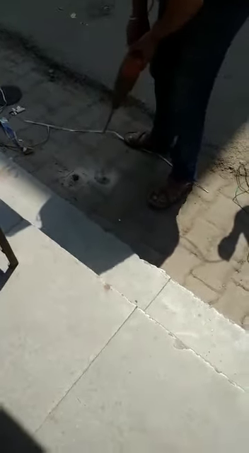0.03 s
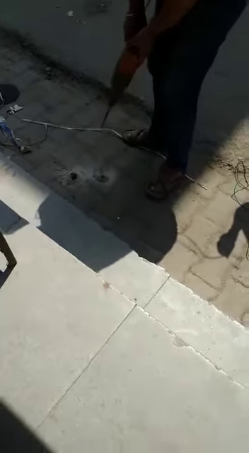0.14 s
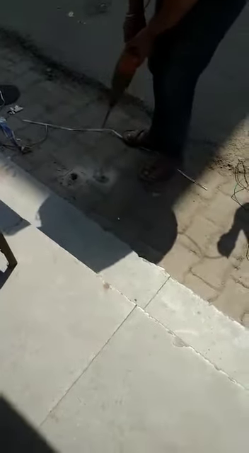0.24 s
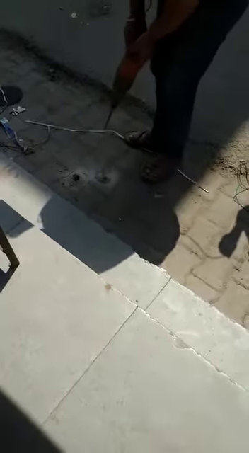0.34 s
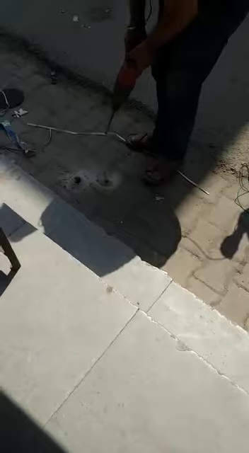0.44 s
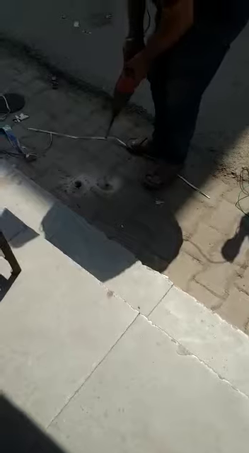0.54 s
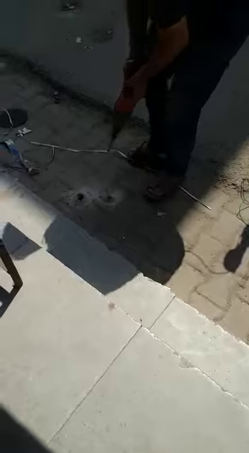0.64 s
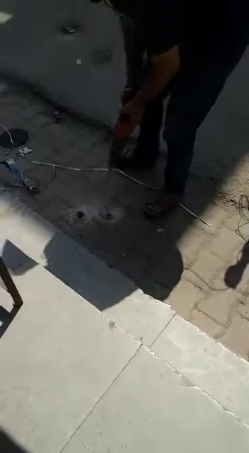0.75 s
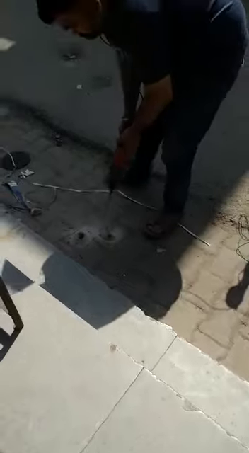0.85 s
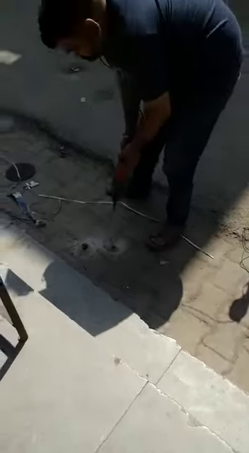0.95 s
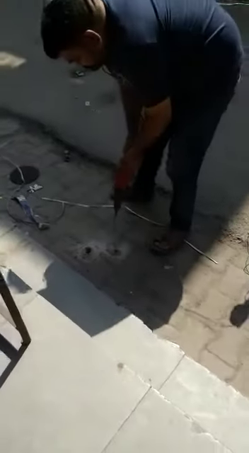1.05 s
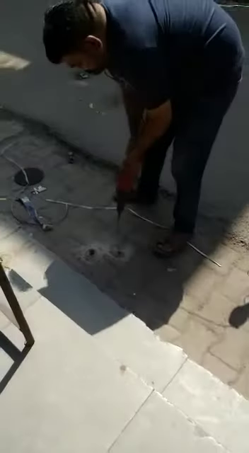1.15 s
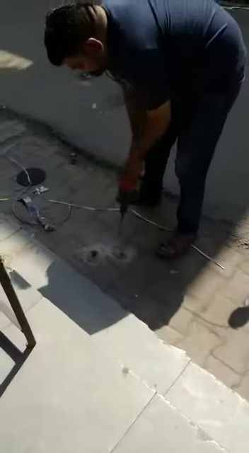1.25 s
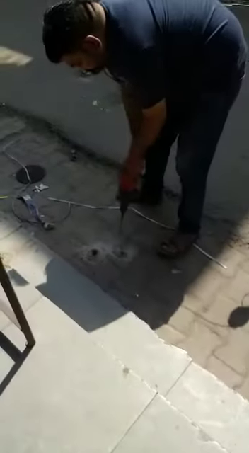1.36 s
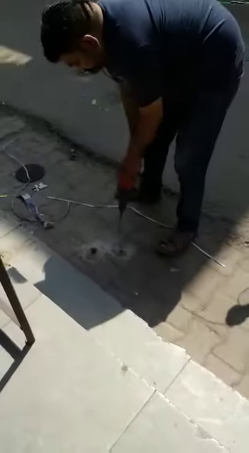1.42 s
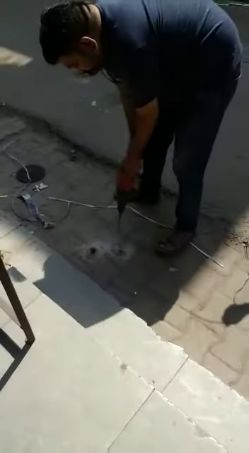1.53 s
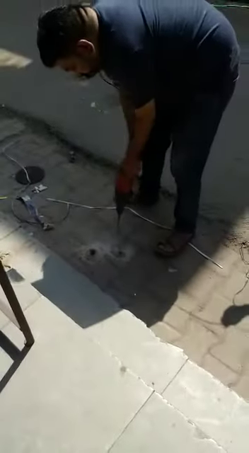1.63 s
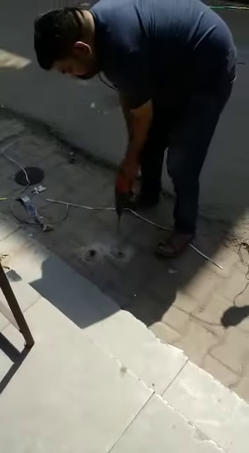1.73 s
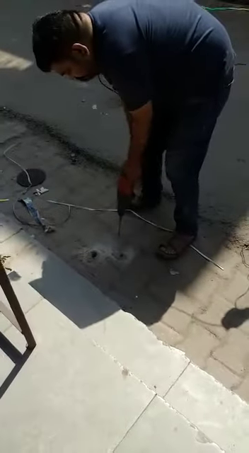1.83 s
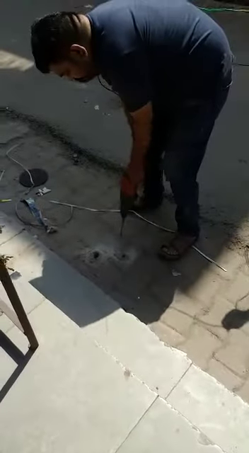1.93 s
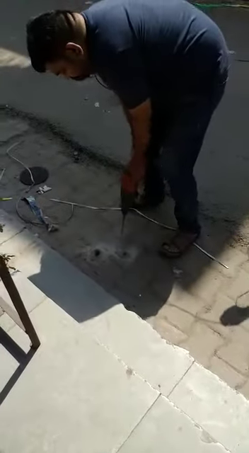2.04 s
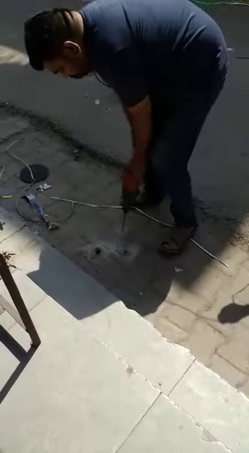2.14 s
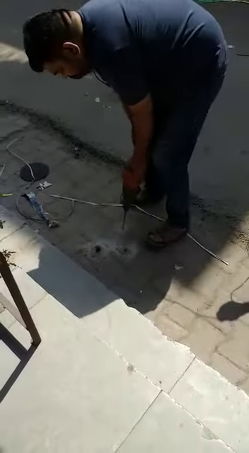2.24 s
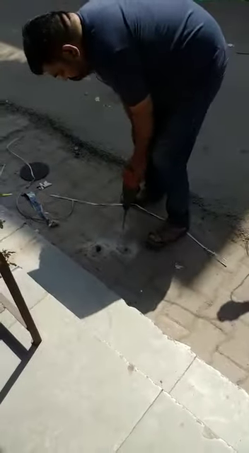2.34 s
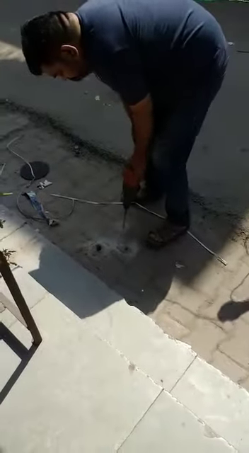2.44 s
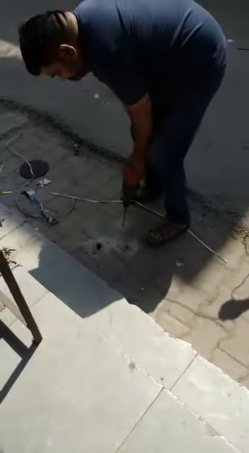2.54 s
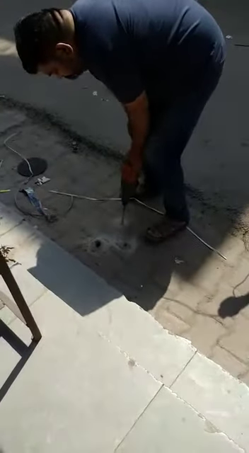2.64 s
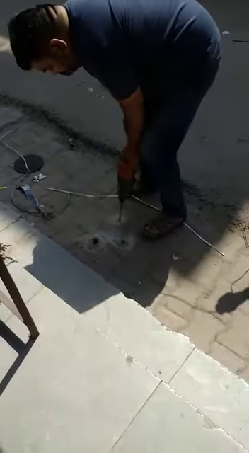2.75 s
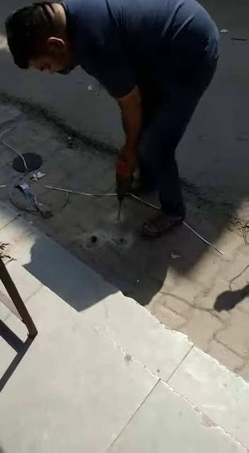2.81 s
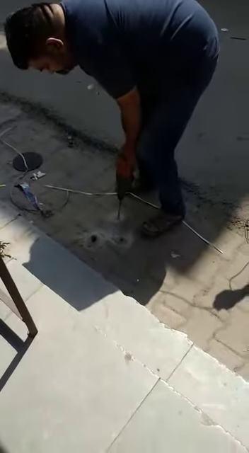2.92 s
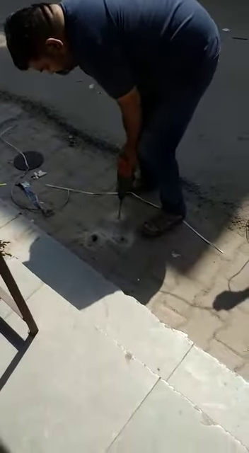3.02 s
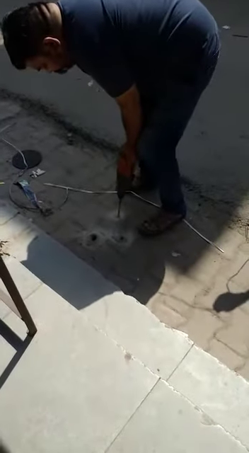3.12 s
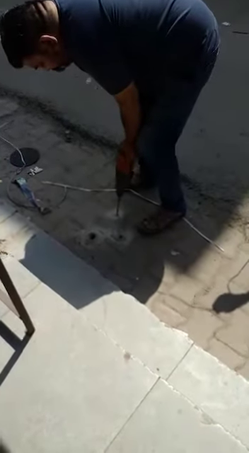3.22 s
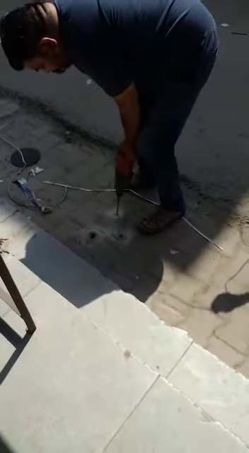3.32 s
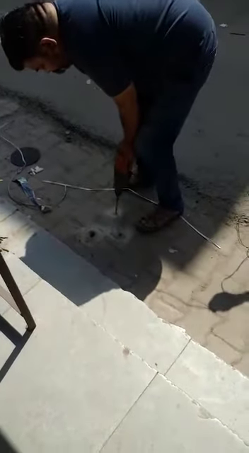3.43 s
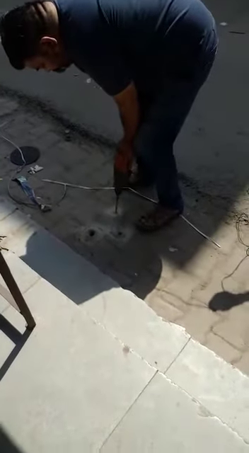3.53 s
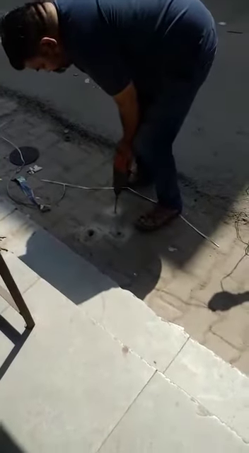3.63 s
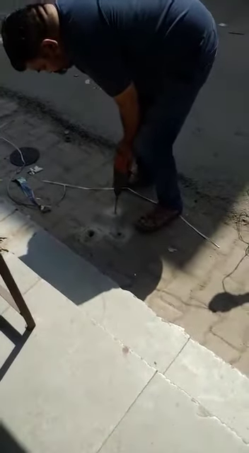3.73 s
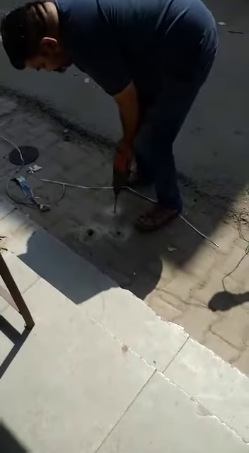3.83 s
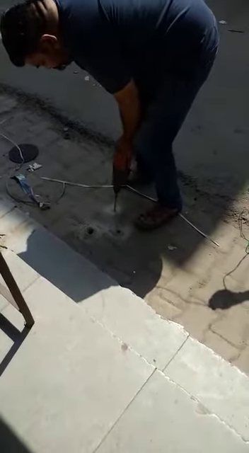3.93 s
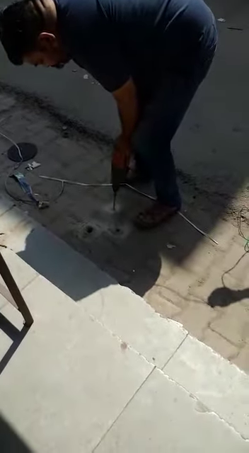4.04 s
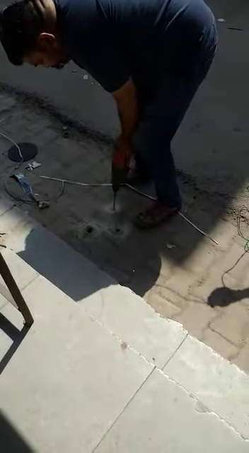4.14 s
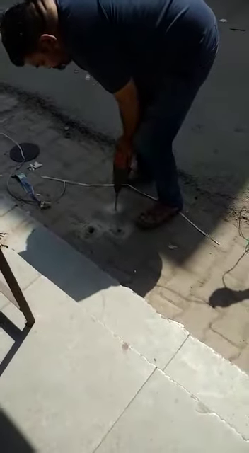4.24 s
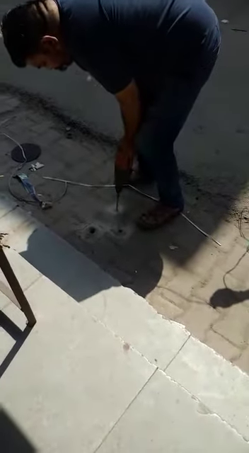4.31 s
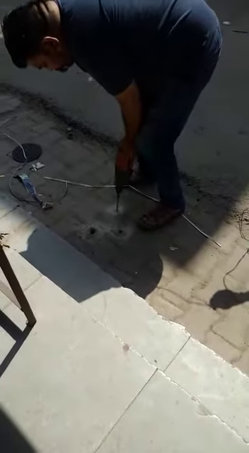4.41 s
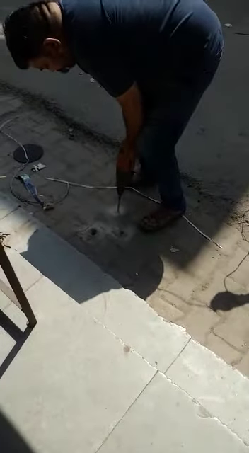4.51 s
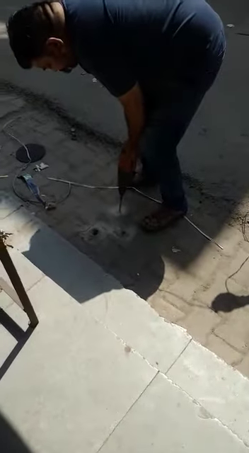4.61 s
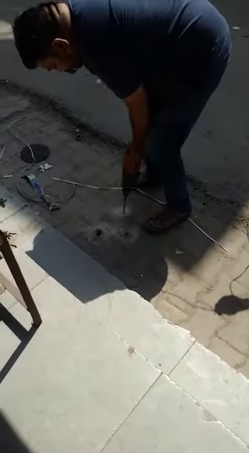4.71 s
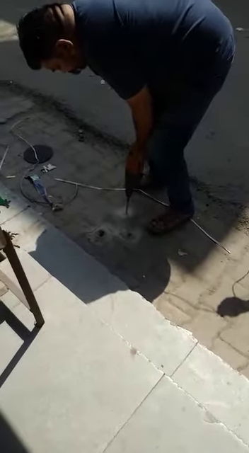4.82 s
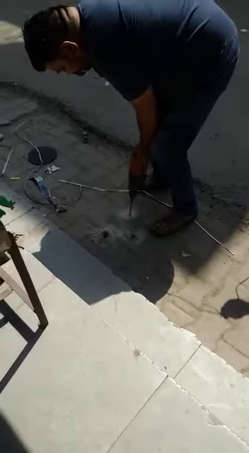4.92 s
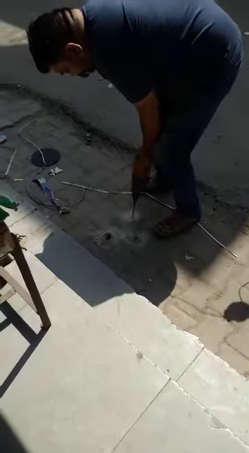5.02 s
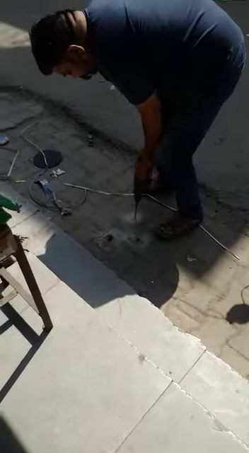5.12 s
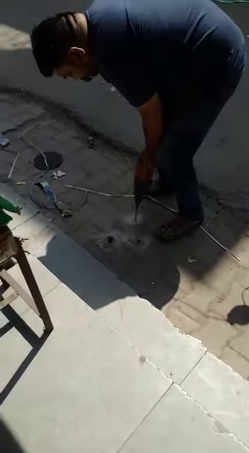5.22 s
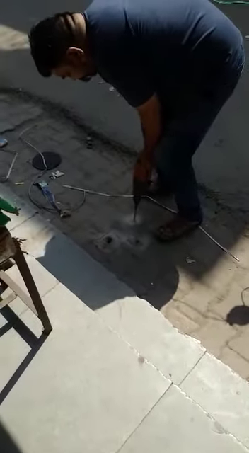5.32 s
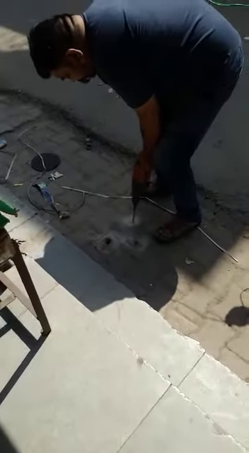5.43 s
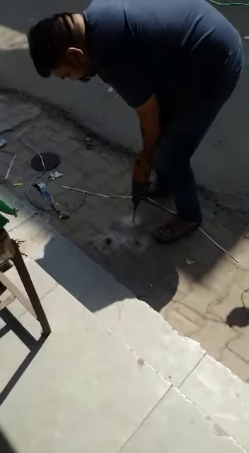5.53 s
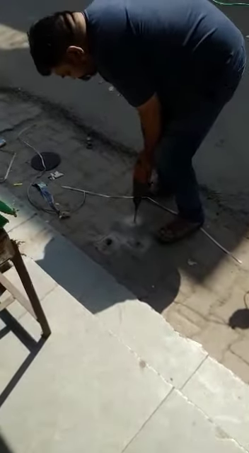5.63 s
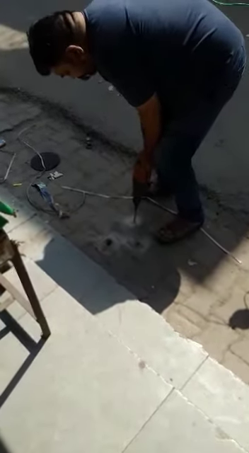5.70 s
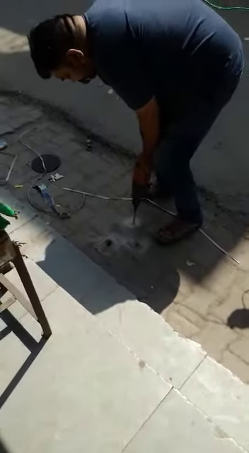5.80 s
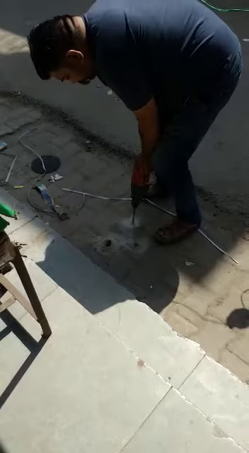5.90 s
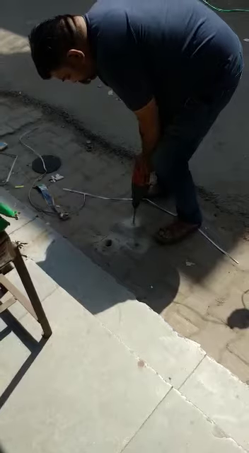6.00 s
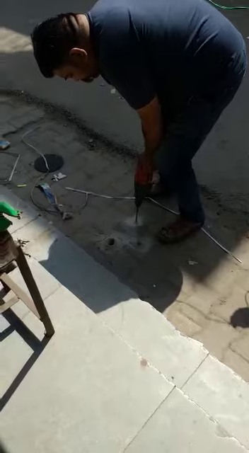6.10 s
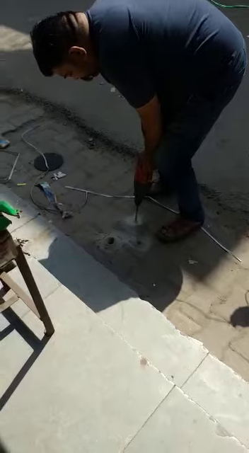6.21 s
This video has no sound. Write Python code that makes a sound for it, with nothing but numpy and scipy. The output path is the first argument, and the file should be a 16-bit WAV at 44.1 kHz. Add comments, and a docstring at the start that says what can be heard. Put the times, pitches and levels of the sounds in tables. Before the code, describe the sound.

A heavy corded hammer drill about two metres away in a lane runs down with a rattling whirr over low street rumble. The bit tip ticks on the paving, the motor spins up fast, the tip rasps, then it bites into concrete with a burst of rapid hammering, steel ringing and gear whine. The drilling continues to the end, softening a little late on. Phone microphone, short reflections from house fronts.

```python
"""A corded hammer drill coasts down, is set on concrete paving, spins up and drills, two metres away in a lane.
One turning shaft times the blows, rebounds and gear play; noise bursts at these moments rattle the housing, and
blows and rebounds ring the steel bit. Tones locked to the shaft make the gear whine and the drone of the slab.
The shank chatters in its chuck, grit snaps, the tip knocks and skids before it bites. Paving and house fronts
reflect the drill over a low street rumble; a phone microphone trims both ends of the spectrum."""
import sys
import numpy as np
from scipy import signal
from scipy.fft import rfft, irfft
from scipy.io import wavfile
from scipy.ndimage import uniform_filter1d

SR = 44100
rng = np.random.default_rng(int(sys.argv[2]) if len(sys.argv) > 2 else 0)


def bounce(signal):
    """Save signal as a 16-bit WAV file at the path given by the first command-line argument."""
    frames = np.transpose(np.atleast_2d(signal))
    limited = np.clip(frames, -1, 1)
    pcm = np.round(limited * 32767).astype(np.int16)
    wavfile.write(sys.argv[1], SR, pcm)


N = 276045
TIME = np.arange(N) / SR

FULL_HZ = 64  # hammer rate that counts as full speed
BITE_S, GRIP_S = 1.728, 0.082  # the tip bites into the concrete; the hammer takes hold over GRIP_S


def undb(db):
    """Decibels to gain."""
    return 10 ** (np.asarray(db) / 20)


def unit(x):
    """Scale to rms 1."""
    return x / np.sqrt(np.mean(x ** 2))


def curves(rows):
    """One value per sample for each column after the time column of a table."""
    s, *columns = np.transpose(rows)
    return [np.interp(TIME, s, column) for column in columns]


def walk(rate_hz):
    """Smooth random wandering with a spread near 1, given a new target rate_hz times a second."""
    step = int(SR / rate_hz)
    targets = np.repeat(rng.standard_normal(N // step + 1), step)
    return unit(uniform_filter1d(targets, step)[:N])


def colour(x, spectrum, size=4096):
    """Causal minimum-phase filter with the given spectrum."""
    hz, db = np.transpose(spectrum)
    bins_hz = np.fft.rfftfreq(size, 1 / SR)
    log_gain = np.log(undb(np.interp(np.log(bins_hz + 1), np.log(hz), db)))
    # folding the cepstrum onto positive time makes the filter causal
    cepstrum = irfft(log_gain) * np.r_[1, np.full(size // 2 - 1, 2), np.zeros(size // 2)]
    impulse = irfft(np.exp(rfft(cepstrum)))
    return signal.fftconvolve(x, impulse)[:N]


def ring(x, modes):
    """Drive a set of resonances side by side."""
    out = np.zeros(N)
    for hz, width_hz, db in modes:
        b, a = signal.iirpeak(hz, hz / width_hz, fs=SR)
        out = out + undb(db) * signal.lfilter(b, a, x)
    return out


def band(x, edge_hz, kind, order=4):
    """Low-pass or high-pass without delay."""
    return signal.sosfiltfilt(signal.butter(order, edge_hz, kind, fs=SR, output="sos"), x)


def steady(x):
    """Hold the level over a fifth of a second at rms 1, so single knocks still stand out."""
    return x / np.sqrt(uniform_filter1d(x ** 2, SR // 5) + 1e-12)


def envelope(start_s, attack_s, hold_s, release_s):
    """Straight rise, hold, straight fall."""
    corners_s = start_s + np.cumsum([0, attack_s, hold_s, release_s])
    return np.interp(TIME, corners_s, [0, 1, 1, 0])


def burst(peak_s, attack_s, hold_s, decay_s):
    """Rise to a peak, hold, then die away exponentially."""
    rise = np.clip(1 + (TIME - peak_s) / attack_s, 0, 1)
    return rise * np.exp(-np.maximum(TIME - peak_s - hold_s, 0) / decay_s)


def swell(middle_s, length_s):
    """A rounded hump with a flat top."""
    return np.exp(-((TIME - middle_s) / (length_s / 2)) ** 4)


# speed of the motor under load: start_s, hammer_rate_hz
LOADED_SPEED = [(1.8, 60.53), (1.9, 61.06), (2.0, 64.57), (2.13, 65.82), (2.62, 65.82), (2.98, 63.88),
                (3.35, 63.62), (3.68, 65.7), (3.85, 65.19), (4.08, 65.55), (4.4, 64.4), (4.7, 64.43),
                (5.35, 63.29), (6.25, 63.04)]
COAST_HZ, COAST_S = 54.02, 1.13  # hammer rate at the start, time constant of the coasting
TRIGGER_S, SPIN_UP_S = 1.43, .17  # moment of the trigger pull, time constant of the spin-up


def motor():
    """Hammer rate in Hz: friction slows the free motor, the trigger spins it up, then the load sets its speed."""
    coasting = COAST_HZ * np.exp(-np.minimum(TIME, TRIGGER_S) / COAST_S)
    spun = 1 - np.exp(-np.maximum(TIME - TRIGGER_S, 0) / SPIN_UP_S)
    # spin-up is complete at the first row of the table
    share = np.minimum(spun / np.interp(LOADED_SPEED[0][0], TIME, spun), 1)
    return coasting + share * (curves(LOADED_SPEED)[0] - coasting)


def knocks(turns, scatter_db, jitter_s):
    """One click per whole turn, each with its own size and a slightly uneven moment."""
    at_s = np.interp(np.arange(1, int(turns[-1])), turns, TIME)
    chance = rng.standard_normal((len(at_s), 2))
    where = np.clip((at_s + jitter_s * chance[:, 0]) * SR, 0, N - 1).astype(int)
    sizes = undb(scatter_db * np.clip(chance[:, 1], -2, 2))
    return np.bincount(where, sizes, N)


def crunch(clicks, decay_s):
    """Each click lets off a short decaying burst of crushing noise."""
    pole = np.exp(-1 / (decay_s * SR))
    return unit(signal.lfilter([1], [1, -pole], clicks) * rng.standard_normal(N))


def hammer(turns):
    """Noise bursts of the main blow, of its rebound, and of gear play on each of 7 armature turns a cycle."""
    blow = crunch(knocks(turns, scatter_db=1.0, jitter_s=.0005), decay_s=.0022)
    rebound = crunch(knocks(turns + .41, scatter_db=0, jitter_s=.0005), decay_s=.0025)
    play = crunch(knocks(7 * turns, scatter_db=2, jitter_s=.0006), decay_s=.0011)
    return steady(blow), steady(rebound), steady(play)


# how the housing colours the rattle: pitch_hz, level_db (relative)
HOUSING_SPECTRUM = [(80, -26), (170, -14), (340, -18.5), (600, -13.5), (820, -8.5), (1020, -7), (1350, -1),
                    (1900, 0), (3000, 0.5), (3700, -3.5), (4600, 0), (5700, 2), (7000, -13), (8500, -27),
                    (10000, -29), (12000, -20), (16000, -20.5)]
# share of knocking against the rush of the fan: running free, and added at a contact of 1
KNOCK_FREE, KNOCK_PRESSED = .17, .28


def housing(blow, rebound, play, contact, treble_db):
    """Blows, gear play and the rush of fan and brushes sound through the gear case; harder running is brighter."""
    rush = rng.standard_normal(N)
    knocking = (KNOCK_FREE + KNOCK_PRESSED * contact) * (blow + undb(-1.5) * rebound)
    body = colour(rush + knocking + undb(-2.5) * play, HOUSING_SPECTRUM)
    low = band(body, 8000, "low")
    treble = body - low
    return steady(low) + undb(treble_db) * steady(treble)


RATTLE_DB_PER_OCTAVE = 13.5  # rise of rattle and whirr for each doubling of speed
WHIRR_DB, WHIRR_SPREAD_HZ = -27.5, 670  # level at full speed, roughness on each side of the mesh tone


def whirr(turns, rate):
    """Without load the teeth rattle in their play, which smears the mesh tone into a band."""
    tone = np.sqrt(2) * np.cos(2 * np.pi * 42 * turns)  # 7 armature turns a cycle x 6 pinion teeth
    rough = unit(band(rng.standard_normal(N), WHIRR_SPREAD_HZ, "low", order=2))
    level_db = WHIRR_DB + RATTLE_DB_PER_OCTAVE * np.log2(rate / FULL_HZ)
    return undb(level_db) * rough * tone


# high modes of the shank, each set passed twice: pitch_hz, width_hz (per pass), level_db (per pass)
SHANK_MODES = [(5530, 260, 1), (9030, 280, -7), (13040, 370, -2)]
# spells of chatter in the chuck: middle_s, length_s, level_db (before the fitful wandering)
CHATTER_SPELLS = [(0, .12, -28), (.2, 0.3, -37), (.47, 0.26, -45), (2.15, .8, -29), (3.8, 0.91, -32),
                  (4.45, 0.5, -39)]


def shank():
    """A thin, fitful ring of steel rubbing in the chuck: noise through its high modes."""
    song = unit(ring(ring(rng.standard_normal(N), SHANK_MODES), SHANK_MODES))
    spells = sum(undb(db) * swell(s, length_s) for s, length_s, db in CHATTER_SPELLS)
    return song * undb(3.0 * walk(63)) * spells


# spectrum of the street air: pitch_hz, level_db (relative)
STREET_SPECTRUM = [(45, -1), (72, 2.5), (100, -1.5), (135, 3.5), (210, -2), (320, -5.5), (420, -5),
                   (640, -4.5), (850, -6.5), (1200, -7.5), (1800, -5), (2500, -14.5), (3500, -22),
                   (6000, -26), (8000, -48)]
# level of the rumble below 207 Hz, before it wavers: start_s, level_db
RUMBLE_LEVEL = [(0, -40.5), (1.0, -40.5), (1.6, -36), (2.4, -47), (4.3, -44.5), (6.26, -52.5)]
# faint tones from down the street: middle_s, length_s, pitch_hz, level_db (peak, before it wavers)
DISTANT_TONES = [(1.46, 0.52, 646, -48), (1.11, 0.26, 2768, -48)]


def street():
    """Wavering rumble of the town, made of coloured noise, with a few thin tones."""
    air = colour(rng.standard_normal(N), STREET_SPECTRUM)
    air = air / np.std(band(air, 207, "low"))
    air = air * undb(curves(RUMBLE_LEVEL)[0] + 1.0 * walk(6.1))
    for s, length_s, hz, db in DISTANT_TONES:
        tone = np.sin(2 * np.pi * hz * TIME)
        air = air + swell(s, length_s) * undb(db + 5.4 * walk(18)) * tone
    return air


# light knocks as the bit is placed: start_s, level_db, ring_s, steel_share (0 housing to 1 steel)
PLACING_TAPS = [(1.282, -35, .018, .97), (1.301, -23.5, .005, 0), (1.312, -31, 0.013, .1),
                (1.33, -30, 0.013, 0.3)]
# rasp of the skidding tip, passed twice: pitch_hz, width_hz (per pass), level_db (per pass)
SKID_RASP = [(4800, 1200, 0)]
SNAP_S, SNAP_DB = .893, -24  # a grain of grit snaps; gain on its high-passed noise
SKID_S, SKID_DB, SKID_DECAY_S = 1.645, -13.5, 0.049


def placing():
    """A grain of grit snaps, the tip knocks on the paving, then skids as it spins up: shaped noise throughout."""
    noise = rng.standard_normal(N)
    steel = unit(ring(ring(noise, SHANK_MODES), SHANK_MODES))
    case = unit(band(colour(noise, HOUSING_SPECTRUM), 2200, "high"))
    snap = undb(SNAP_DB) * np.exp(-np.abs(TIME - SNAP_S) / .0004) * band(noise, 9800, "high")
    out = snap
    for s, db, ring_s, share in PLACING_TAPS:
        decay = (TIME >= s) * np.exp(-np.abs(TIME - s) / ring_s)
        out = out + undb(db) * decay * (share * steel + (1 - share) * case)
    rasp = unit(ring(ring(noise, SKID_RASP), SKID_RASP))
    return out + undb(SKID_DB) * burst(SKID_S, .01, 0.011, SKID_DECAY_S) * rasp


# bending modes of the bit: pitch_hz, width_hz, level_db (relative)
BIT_MODES = [(1416, 54, -1), (2710, 58, 2.5), (5450, 140, 9), (9250, 450, -26), (13464, 930, -4)]
BIT_DB, BIT_WANDER_DB = -11.5, 1.8  # gain of the ring against the housing, and its wandering


def bit(blow, rebound):
    """The blow rings all the steel's modes, the rebound only the highest; the tip wanders in the hole."""
    steel = unit(ring(blow, BIT_MODES)) + undb(-11.5) * unit(ring(rebound, BIT_MODES[-1:]))
    return undb(BIT_DB + BIT_WANDER_DB * walk(25.18)) * steel


def whine(turns, partials, flutter_db):
    """Tones locked to the shaft that crest together once a cycle; each flutters at random."""
    out = np.zeros(N)
    for multiple, db in partials:
        out = out + undb(db + flutter_db * walk(28)) * np.cos(2 * np.pi * multiple * turns)
    return np.sqrt(2) * out


# partials of the slab's drone: multiple (of the hammer rate), level_db (relative)
SLAB_PARTIALS = [(1, -13), (2, -5), (3, -2.5), (4, 2.5), (5, -1.5), (6, -1), (7, 1.5), (8, -4), (9, -1),
                 (11, -2), (14, 1)]
# low hum near 4 and 5 times the hammer rate, passed twice: pitch_hz, width_hz (per pass), level_db (per pass)
HUM_MODES = [(261, 92, 0), (314, 70, 0)]
# the drone's gain, its extra at first, and the time constant of settling once through the surface
DRONE_DB, DRONE_FRESH_DB, DRONE_SETTLE_S = -51, 8, 1
HUM_DB, HUM_HOLD_S, HUM_DECAY_S = -34, 0.2, 0.24


def slab(turns, grip, drilled_s):
    """The paving drones at multiples of the hammer rate, with a low noisy hum, strong as drilling begins."""
    drone_db = DRONE_DB + DRONE_FRESH_DB * np.exp(-drilled_s / DRONE_SETTLE_S)
    drone = grip * undb(drone_db) * whine(turns, SLAB_PARTIALS, flutter_db=.8)
    hum = unit(ring(ring(rng.standard_normal(N), HUM_MODES), HUM_MODES))
    humming = burst(BITE_S, .03, HUM_HOLD_S, HUM_DECAY_S)
    return drone + undb(HUM_DB) * humming * hum


# gear mesh whine, around 7 armature turns x 6 pinion teeth: multiple (of the hammer rate), level_db (relative)
MESH_PARTIALS = [(39, -19), (40, -9), (41, -16), (42, 0), (43, -14), (44, -9), (45, -14), (84, -15)]
# armature whine: multiple (of the hammer rate), level_db (relative)
ARMATURE_PARTIALS = [(13, -11.5), (16, -10.5), (19, -5), (20, -8), (21, 1.5), (23, -7), (40, -7), (44, -10),
                     (45, -10), (68, -9)]
# gains at full speed: mesh while the hammer drives hard, mesh otherwise, armature
MESH_DB, MESH_FAINT_DB, ARMATURE_DB = -23.5, -31, -32.5
# for each Hz of sag the mesh fades and the armature grows
MESH_DB_PER_HZ, ARMATURE_DB_PER_HZ = .7, 1


def gears(turns, rate):
    """Gear mesh and armature whine; a sagging motor shifts the weight from the first to the second."""
    sag_hz = np.clip(FULL_HZ - rate, -2, 1)
    # the gears are loudest as they drive the hammer, just before the blow
    drive = turns + .14
    singing = envelope(start_s=1.79, attack_s=0.21, hold_s=2.74, release_s=.1)
    mesh_gain = undb(MESH_FAINT_DB) + (undb(MESH_DB) - undb(MESH_FAINT_DB)) * singing
    mesh_gain = mesh_gain * undb(-MESH_DB_PER_HZ * sag_hz)
    armature_gain = undb(ARMATURE_DB + ARMATURE_DB_PER_HZ * sag_hz)
    mesh = mesh_gain * whine(drive, MESH_PARTIALS, flutter_db=1.3)
    return mesh + armature_gain * whine(drive, ARMATURE_PARTIALS, flutter_db=1.3)


def lane(x, t60_s, wet_db):
    """Scattered reflections from paving and house fronts: a decaying noise tail after 6 ms."""
    t = TIME[:SR // 2]
    tail = rng.standard_normal(len(t)) * np.exp(-np.log(1000) * t / t60_s) * (t > .006)
    return x + undb(wet_db) * signal.fftconvolve(x, tail / np.linalg.norm(tail))[:N]


# how hard the bit bears on the concrete, once gripped: start_s, level_db
BIT_FORCE = [(1.74, 4), (2.3, 2.5), (3.25, 0.5), (3.85, -2), (4.6, -1.5), (5.0, -13), (5.55, -14),
             (6.26, 1)]
# running free at full speed: gain of the rattle, and of its treble above 8 kHz relative to the rest
RATTLE_DB, TREBLE_DB, TREBLE_DB_PER_OCTAVE = -16.5, -13.0, 4.5
FORCE_RATTLE_DB, FORCE_TREBLE_DB = 1.48, 2  # added to them by a force of 1
BIT_DAMPING_DB_PER_S = 0.2  # the deepening hole damps the bit
# the machine bucks as the tip catches: extra strength (share of the clatter)
JOLT, JOLT_RISE_S, JOLT_DECAY_S = 0.64, 0.16, 0.15


def scene():
    """One shaft drives blows, rattle and whine; speed and force on the bit set their strength."""
    rate = motor()
    octaves = np.log2(rate / FULL_HZ)
    turns = np.cumsum(rate * (1 + .0012 * walk(45))) / SR  # the bit snags, so the speed trembles
    grip = np.clip(1 + (TIME - BITE_S) / GRIP_S, 0, 1)
    drilled_s = np.maximum(TIME - BITE_S, 0)
    force = grip * undb(curves(BIT_FORCE)[0])
    contact = force * undb(-BIT_DAMPING_DB_PER_S * drilled_s)
    rattle_db = RATTLE_DB + RATTLE_DB_PER_OCTAVE * octaves + FORCE_RATTLE_DB * force
    treble_db = TREBLE_DB + TREBLE_DB_PER_OCTAVE * octaves + FORCE_TREBLE_DB * force
    blow, rebound, play = hammer(turns)
    rattle = housing(blow, rebound, play, contact, treble_db)
    jolt = 1 + JOLT * burst(BITE_S - .05, JOLT_RISE_S, .02, JOLT_DECAY_S)
    clatter = jolt * undb(rattle_db) * (rattle + contact * bit(blow, rebound))
    unloaded = (1 - grip) * whirr(turns, rate)
    airborne = lane(clatter + unloaded + shank() + placing(), t60_s=0.28, wet_db=-11.0)
    mix = airborne + street() + slab(turns, grip, drilled_s) + grip * gears(turns, rate)
    return mix[None]


def record(dry):
    """The phone microphone drops the deepest bass, rounds the highest peaks and cuts the top."""
    thin = signal.sosfilt(signal.butter(8, 54, "high", fs=SR, output="sos"), dry)
    rounded = thin / (1 + (thin / .97) ** 6) ** (1 / 6)
    return signal.sosfilt(signal.ellip(12, .2, 80, 15900, fs=SR, output="sos"), rounded)


dry = scene()
out = record(dry)
bounce(out)
```